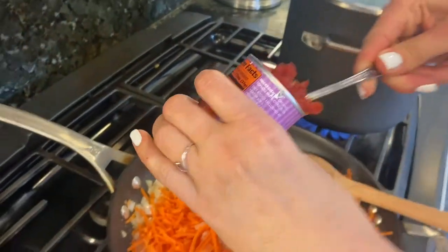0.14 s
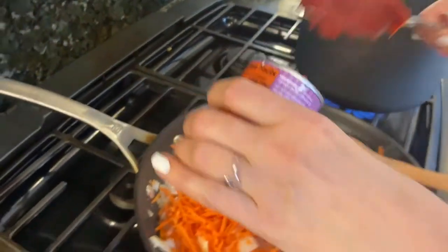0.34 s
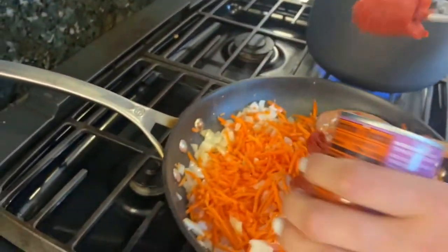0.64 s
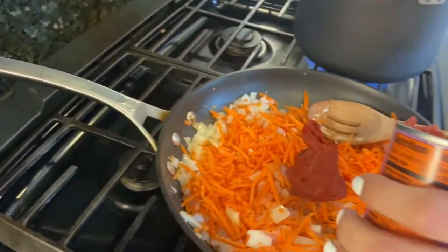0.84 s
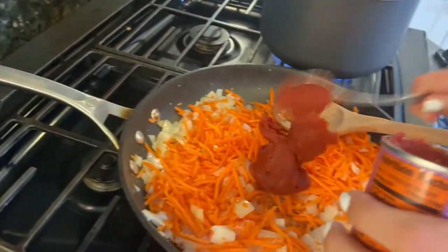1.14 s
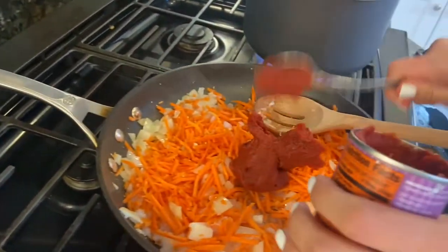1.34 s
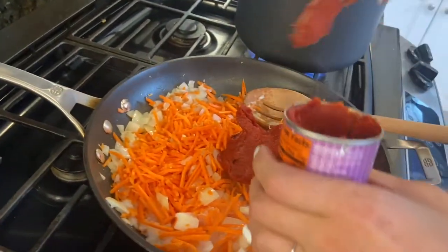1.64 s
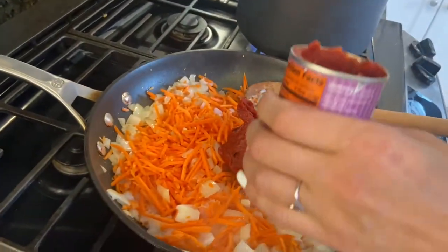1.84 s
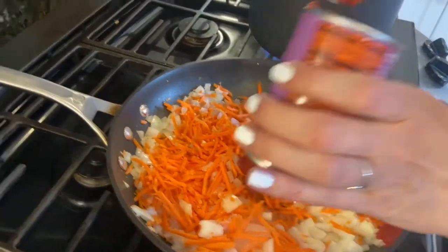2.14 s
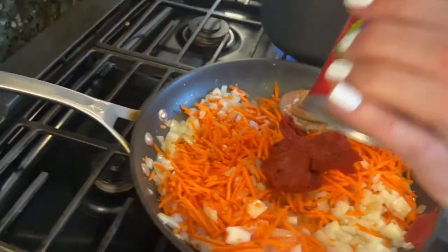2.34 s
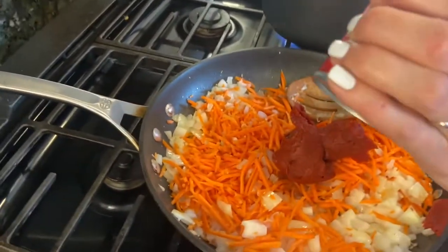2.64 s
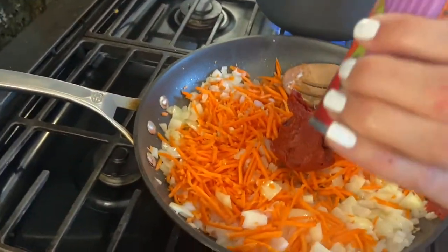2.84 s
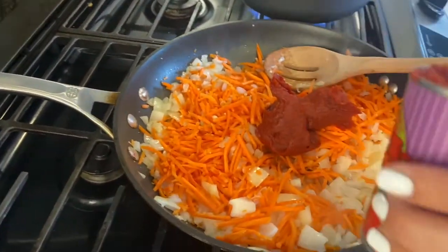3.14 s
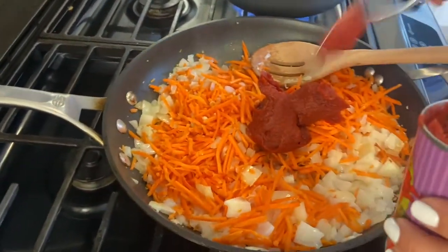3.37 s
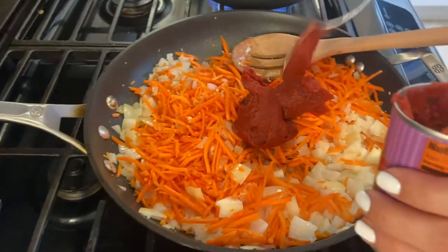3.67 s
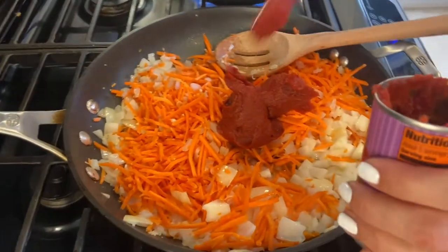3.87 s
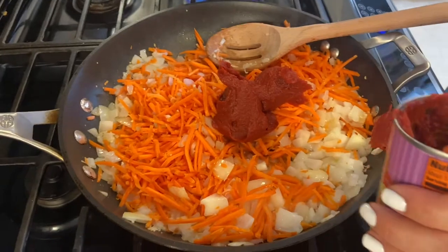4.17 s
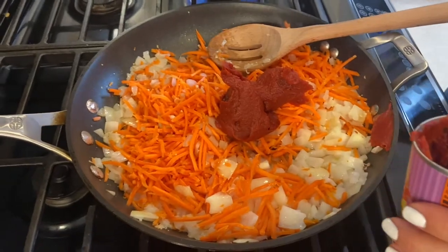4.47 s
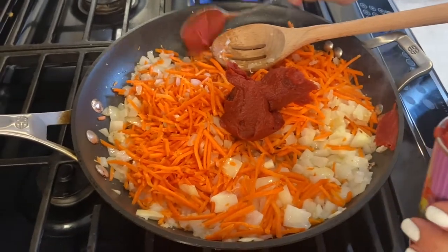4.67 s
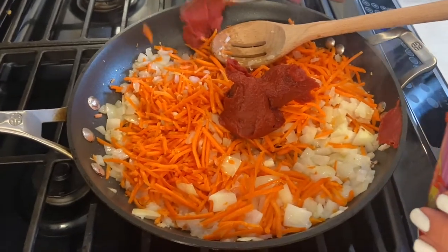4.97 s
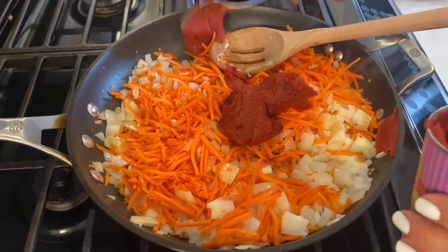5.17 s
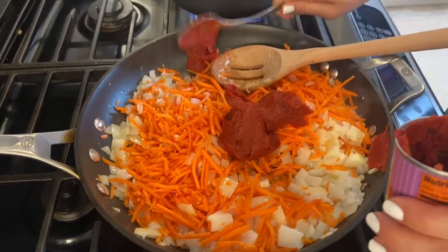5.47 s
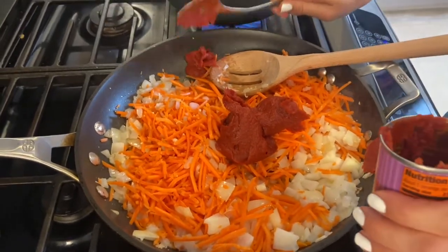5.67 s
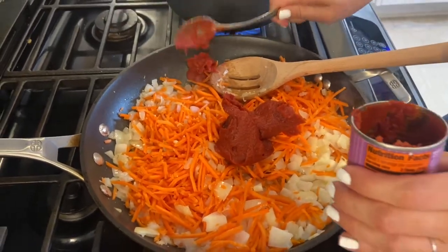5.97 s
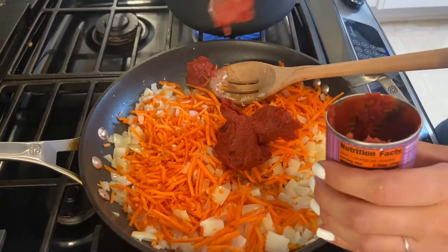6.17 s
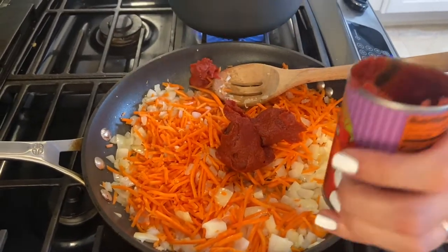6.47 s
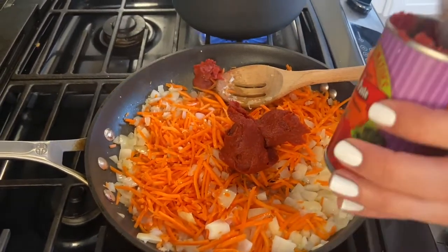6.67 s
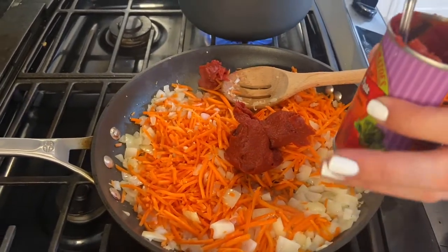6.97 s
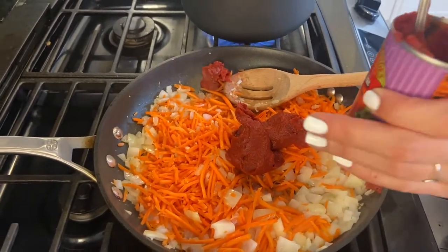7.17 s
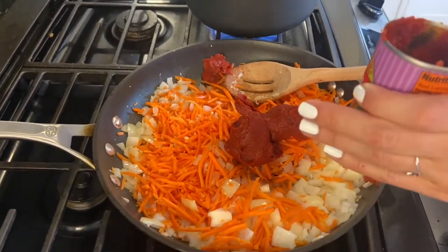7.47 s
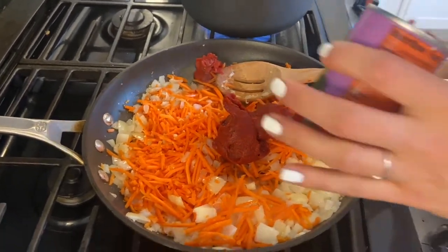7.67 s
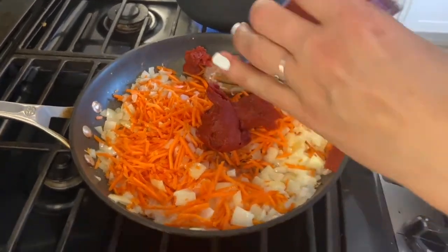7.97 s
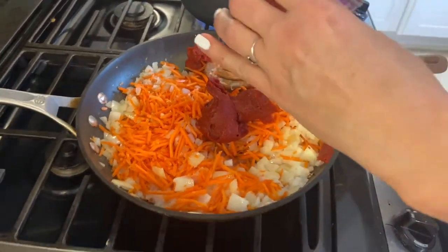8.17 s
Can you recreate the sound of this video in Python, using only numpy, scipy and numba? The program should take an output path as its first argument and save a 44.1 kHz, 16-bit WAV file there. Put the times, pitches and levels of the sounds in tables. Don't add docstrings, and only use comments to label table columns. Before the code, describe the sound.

Faint scrapes and knocks of a spoon inside a small paste-filled can, with a hollow ring, come in two early bursts over a quiet wavering burner. After a gap, nine quick even metal raps strike a pan, each a short dull clank with rattle and low stove thump. Then louder can knocks, scraping and a slight wet slump. Close, left-sided pickup in a small hard-walled kitchen, with only faint electronic hiss on the right.

```python
import sys
import numpy as np
from scipy import signal
from scipy.io import wavfile
from scipy.ndimage import uniform_filter1d
from numba import njit

SR = 44100
rng = np.random.default_rng(int(sys.argv[2]) if len(sys.argv) > 2 else 0)


def persist_wave(psi):
    counts = np.round(np.clip(psi, -1, 1) * 32767).astype(np.int16)
    wavfile.write(sys.argv[1], SR, np.atleast_2d(counts).T)


def invert_db(x):
    u = np.asarray(x, float) / 20
    return 10 ** u


N = 366912

# frequency in Hz, level in dB per Hz.
FLAME = [(8.8, -29), (15, 6.5), (26, 1.5), (75, -11), (110, -14.5), (135, -17.5), (242, -18.5),
         (315, -15.5), (461, -18), (503, -11), (1050, -18), (2110, -15), (6050, -19), (14100, -37),
         (16400, -50)]
FLAME_DB = -54
# centre in Hz, width in Hz, level in dB.
FLAME_TONES = [(103.2, 30, -69), (507.5, 58, -72.5), (792, 29, -74.5), (1336, 510, -67.5)]
# centre in seconds, half length in seconds, rumble in dB.
ARMS = [
    (.1, 0.2, 6),
    (2.62, 0.18, 2),
    (6.15, 0.14, 0.5),
    (7.4, 0.11, 3),
]
SHAKE_SETTLE_S, SHAKE_HISS_DB, SHAKE_RUMBLE_DB, RUMBLE_WANDER_DB = 0.35, 0.4, 5.5, 5.5
KITCHEN_T60_S, KITCHEN_DB = 0.32, -17.5
# start in seconds, level in dB.
SLUMP = [
    (7.385, -48),
    (7.398, -47.5),
    (7.421, -43),
    (7.435, -54),
]

# frequency in Hz, level in dB, t60 in seconds.
CAN_WALL = [(1360, 6, 0.11), (1800, 10, 0.033), (2090, 12, 0.014), (2420, 12, 0.05), (2700, -13, 0.078),
            (4110, -15.5, 0.014), (4270, -17, 0.015), (5500, -4.5, 0.005)]
# start in seconds,
# length in seconds, peak in dB, air column in Hz, grit in dB.
STROKES = [(-.03, 0.13, -58, 870, -14), (.06, .12, -55.5, 790, -16), (0.213, 0.088, -50, 796, -8),
           (2.64, 0.098, -47.5, 837, -9.5), (2.709, .1, -48.5, 840, -20), (2.804, 0.098, -52.5, 850, -5),
           (6.723, 0.06, -61, 905, -12), (6.871, .075, -53.5, 953, -8), (7.163, 0.085, -49.5, 820, -6.5),
           (7.226, 0.097, -47, 835, -15), (7.904, 0.075, -56.5, 860, -16), (8.036, 0.039, -46.5, 990, -21),
           (8.084, 0.054, -52.5, 1000, -3)]
STROKE_PEAK_AT, STROKE_ROUND = 0.59, 0.99
# start in seconds, t60 in seconds,
# level in dB, air column in Hz, grit in dB.
SLIDES = [
    (.18, 0.24, -54, 760, -20),
    (.31, 0.24, -56, 990, -14),
    (2.215, 0.51, -58, 980, -1),
    (2.395, 0.23, -46, 1050, -14),
    (2.43, 0.33, -55.5, 1005, 0),
    (6.815, 0.64, -58, 970, -12),
    (7.385, 0.68, -55, 870, -18),
    (7.845, 0.2, -58, 885, -17),
    (7.995, 0.11, -58, 1000, -15),
    (8.2, 0.49, -62, 930, -14.5),
]
SLIDE_SAG_HZ_PER_S = 180
# start in seconds, peak in dB, air column in Hz,
# hardness of the contact in dB, struck patch of wall in Hz.
KNOCKS = [(0.047, -57, 800, -13, 3080), (0.124, -50.5, 810, -11, 1560), (0.264, -49, 861, -7, 2300),
          (0.292, -33.5, 958, -24, 1730), (2.164, -28.5, 880, -11.5, 2890), (2.174, -33.5, 1024, -34, 2060),
          (2.192, -32, 900, -24, 1800), (2.377, -27.5, 963, -20.5, 2000), (2.542, -45.5, 836, -21, 1840),
          (2.875, -49, 980, -4, 2480), (6.692, -34.5, 860, -5, 2710), (6.784, -22, 1022, -21.5, 1670),
          (6.793, -23.5, 947, -47, 1520), (6.971, -39.5, 783, -24, 2180), (7.191, -42, 906, -15, 2200),
          (7.205, -40, 814, -19, 2200), (7.2195, -43, 840, -23, 2400), (7.297, -46, 790, -15, 3200),
          (7.35, -28, 855, -28.5, 1500), (7.37, -46.5, 850, -5, 2640), (7.822, -32, 904, -8, 2010),
          (7.968, -17, 1037, -28.5, 2100), (8.108, -46.5, 970, -13, 2160), (8.178, -40, 800, -27, 1800)]
COLUMN_T60_S = 0.019
WALL_RING_DB, RING_PER_HARD, RING_PER_BLOW = -3, 0.5, 0.34

# start in seconds, peak in dB, high modes in dB, edge in dB,
# hop of the pan in dB.
RAPS = [
    (4.6536, -15.5, -3.5, 1.5, -11.5),
    (4.818, -16, -5.5, -26, -8),
    (4.9574, -14, -5, -17, -11.5),
    (5.1041, -14.5, -3.5, -10.5, -11.5),
    (5.2616, -13.5, -0.5, -4, -9.5),
    (5.406, -12.5, -3, -4.5, -10),
    (5.558, -13, -3, -4.5, -10),
    (5.7222, -13, -2, -5, -10.5),
    (5.8889, -17.5, 3.5, -39, -11),
]
# frequency in Hz, level in dB, t60 in seconds.
PAN = [(297.5, -10.5, 0.07), (586, -4.5, 0.028), (686, -4, 0.18), (771.4, 2.5, 0.079), (958, 2.5, 0.035),
       (1123, -13, 0.13), (1260, 2, 0.027), (1356, -15.5, 0.21), (1440, -13, 0.12), (1499, -1.5, 0.044),
       (1590, 2.5, 0.042), (1800, 4, 0.048), (1890, -44, 0.05), (2300, -16, 0.055), (2555, -4.5, 0.031),
       (2810, -19.5, 0.15), (3440, -18, 0.082), (3640, -4.5, 0.019), (4200, -19, 0.013), (4660, -10, 0.028),
       (5075, -2.5, 0.033), (5580, 3, 0.011), (5930, -7.5, 0.026), (6270, 1.5, 0.0075), (6830, 0.5, 0.021),
       (7360, -7.5, 0.026), (8550, -18, 0.039), (10470, -9.5, 0.017), (14200, -29, 0.01)]
# centre in Hz, width in Hz, level in dB.
RIM = [(7090, 380, 6), (8620, 350, -1.5), (10340, 360, -3), (14400, 750, -17)]
LOW_MODES_DB, LOW_PER_BLOW = -9, -0.9
# frequency in Hz, level in dB, t60 in seconds.
SPOON = [(2055, -2.5, 0.082), (2744, -4, 0.11), (3890, 11.5, 0.022), (4300, -5.5, 0.23), (4900, -24, .15),
         (9070, 1, 0.013), (11130, -7, 0.012), (14400, -7, .008)]
# time in seconds, level in dB.
SPOON_FREE = [
    (4.7, -37),
    (5.5, -33),
    (5.72, -28),
    (5.89, -12.5),
]
# frequency in Hz, level in dB, rise in seconds,
# t60 in seconds.
STOVE = [(27.8, -10, 0.045, 0.62), (44.8, -7, 0.013, 0.087), (54, 3, 0.022, 0.26), (66.8, -5, 0.04, 0.47),
         (101.6, -17.5, 0.035, 0.47), (212, 4.5, 0.022, 0.13)]


def level(x, db):
    return x * invert_db(db) / np.sqrt(np.mean(x ** 2))


@njit
def svf(x, hz, width):
    y, b, l = np.empty(len(x)), 0., 0.
    for i in range(len(x)):
        g, k = np.tan(np.pi * hz[i] / SR), width / hz[i]
        v = (b + g * (x[i] - l)) / (1 + g * (g + k))
        b, l, y[i] = 2 * v - b, l + 2 * g * v, k * v
    return y


def band(x, hz, width):
    return svf(x, np.full(len(x), 1. * hz), 1. * width)


def walk(rate):
    hold = int(SR / rate)
    steps = np.repeat(rng.standard_normal(N // hold + 1), hold)
    return 0.57 * uniform_filter1d(uniform_filter1d(steps, hold), hold)[:N]


def fade(t, t60):
    return np.exp(-np.log(1000) * t / t60)


def sine(hz, t):
    return np.sin(2 * np.pi * hz * t)


def ring(hz, db, t60, seconds):
    t = np.arange(int(seconds * SR))[:, None] / SR
    sign = (-1) ** (np.arange(np.size(hz)) // 2)
    return (sign * invert_db(db) * fade(t, t60) * sine(hz, t)).sum(axis=1)


def grit(size, rate, spread_db):
    on = rng.random(size) < rate / SR
    impacts = on * rng.standard_normal(size) * invert_db(spread_db * rng.exponential(size=size))
    return level(impacts + 1e-9, 0)


def add(out, s, sound):
    i = int(s * SR)
    out[i:i + len(sound)] += sound[:N - i]


def shaken():
    since = np.arange(N) / SR - np.array(RAPS)[:, :1]
    steps = (since > 0) * np.exp(-np.abs(since) / SHAKE_SETTLE_S)
    return uniform_filter1d(steps.sum(axis=0), size=4000)


def flame():
    hz, db = np.transpose(FLAME)
    t = np.arange(N) / SR
    unrest = shaken()
    hiss_db = SHAKE_HISS_DB * unrest
    rumble_db = SHAKE_RUMBLE_DB * unrest + RUMBLE_WANDER_DB * walk(3)
    rumble_db = rumble_db + sum(d * np.exp(-((t - s) / half) ** 2) for s, half, d in ARMS)
    hiss = 0
    for f in 16 * 2 ** np.arange(0, 10.1, 1 / 3):
        noise = band(band(rng.standard_normal(N), f, f / 3), f, f / 3)
        swell_db = rumble_db if f < 55 else hiss_db
        band_db = np.interp(np.log(f), np.log(hz), db)
        hiss = hiss + invert_db(band_db + swell_db + 2.54 * walk(11)) * noise
    tones = sum(level(band(band(rng.standard_normal(N), f, w), f, w), d) for f, w, d in FLAME_TONES)
    return level(hiss, FLAME_DB) + tones


def kitchen(x):
    t = np.arange(int(.5 * SR)) / SR
    noise = rng.standard_normal(len(t))
    low = band(noise, 760, 5100)
    high = noise - low
    tail = low * fade(t, KITCHEN_T60_S) + high * fade(t, 0.23 * KITCHEN_T60_S)
    tail = (t > .006) * tail
    return invert_db(KITCHEN_DB) * signal.fftconvolve(x, tail / np.linalg.norm(tail))[:N]


def paste():
    out, t = np.zeros(N), np.arange(int(.05 * SR)) / SR
    for s, db in SLUMP:
        plop = band(rng.standard_normal(len(t)), 280, 270) * fade(t, 0.1)
        add(out, s, invert_db(db + 12.5) * plop)
    return out


def pressure(t):
    for s, length, db, hz, grit_db in STROKES:
        share = np.clip((t - s) / length, 0, 1) ** (np.log(.5) / np.log(STROKE_PEAK_AT))
        yield invert_db(db) * np.abs(np.sin(np.pi * share)) ** STROKE_ROUND, hz, grit_db
    for s, t60, db, hz, grit_db in SLIDES:
        since = np.clip(t - s, 0, t60)
        sliding = (t >= s) * (since < t60)
        yield invert_db(db) * sliding * fade(since, t60), hz - SLIDE_SAG_HZ_PER_S * since, grit_db


def scrapes():
    def smooth(x):
        return uniform_filter1d(x, size=500)

    moves = list(pressure(np.arange(N) / SR))
    force = smooth(sum(p for p, _, _ in moves))
    rest = invert_db(-100)
    hz = (smooth(sum(p * f for p, f, _ in moves)) + rest * 900) / (force + rest)
    gritty = smooth(sum(p * invert_db(grit_db) for p, _, grit_db in moves))
    slips = grit(N, rate=5000, spread_db=3.0) * invert_db(1.3 * walk(70))
    column = level(svf(svf(slips, hz, 73.0), hz, 370.0), 0)
    wall = sum(invert_db(db) * band(slips, f, 180) for f, db, _ in CAN_WALL)
    wall = wall + invert_db(-0.5) * band(band(slips, 4100, 3000), 4300, 3600)
    return force * column + gritty * level(band(wall, 1700, 5000), 0)


def knocks():
    out = np.zeros(N)
    wall_hz, wall_db, wall_t60 = np.transpose(CAN_WALL)
    t = np.arange(int(.25 * SR)) / SR
    for s, db, hz, tick_db, spot_hz in KNOCKS:
        ring_db = WALL_RING_DB + RING_PER_HARD * tick_db + RING_PER_BLOW * (db + 29.5)
        swell = (1 - np.exp(-t / 0.00023)) * fade(np.maximum(t - .003, 0), COLUMN_T60_S)
        column = swell * sine(hz, t)
        hard_db = np.where(wall_hz > 3200, tick_db, ring_db - 15)
        scatter = rng.standard_normal((2, len(wall_hz)))
        mode_db = wall_db + hard_db + 3 * scatter[1] - 8
        wall = ring(wall_hz * (1 + 0.066 * scatter[0]), mode_db, wall_t60, .25)
        spot = invert_db(ring_db - 11) * fade(t, 0.064) * sine(spot_hz, t)
        wash = band(band(rng.standard_normal(len(t)), spot_hz, 870), 1300, 1280)
        wash = wash * (fade(t, 0.047) + invert_db(-32.0) * fade(t, 0.16))
        hiss = band(band(rng.standard_normal(len(t)), 5860, 4100), 4200, 6500)
        tick = hiss * (fade(t, 0.011) + invert_db(-5) * fade(t, 0.06))
        dent = invert_db(ring_db + 1) * fade(t, 0.0062) * sine(1650, t)
        knock = column + dent + wall + spot + invert_db(ring_db + 13.0) * wash + invert_db(tick_db + 8) * tick
        add(out, s, -invert_db(db + 2.5) * knock)
    return signal.sosfilt(signal.butter(2, 420, "high", fs=SR, output="sos"), out)


def raps():
    out = np.zeros(N)
    hz, db, t60 = np.transpose(PAN)
    t = np.arange(int(.7 * SR)) / SR
    for s, peak_db, high_db, edge_db, hop_db in RAPS:
        low_db = LOW_MODES_DB + LOW_PER_BLOW * (peak_db + 14.5)
        scatter = rng.standard_normal((2, len(hz)))
        place_db = np.interp(hz, [1080, 1336, 2900, 3200, 6050, 6400],
                             [low_db, 0, 0, high_db, high_db, edge_db])
        body = ring(hz * (1 + 0.004 * scatter[0]), db + place_db + 1.84 * scatter[1], t60, .25)
        body = body * (1 - np.exp(-t[:len(body)] / 0.00079))
        spoon = invert_db(np.interp(s, *np.transpose(SPOON_FREE))) * ring(*np.transpose(SPOON), .4)
        noise = rng.standard_normal((2, len(t))) * (fade(t, 0.039) + invert_db(-16.5) * fade(t, 0.24))
        high = band(band(noise[0], 4280, 2300), 4330, 3600)
        edge = band(band(noise[1], 6000, 2800), 7200, 4500)
        rim = sum(invert_db(d) * band(band(noise[1], f, w), f, w) for f, w, d in RIM)
        dense = invert_db(high_db) * high + invert_db(edge_db) * (edge + rim)
        hops = (1 - fade(t, 0.25)) * fade(t, 0.23) * grit(len(t), rate=7000, spread_db=1.5)
        hops = hops * invert_db(2.9 * walk(95)[:len(t)])
        held_db = db + 0.4 * place_db + 2.0 * scatter[0] - 3 * np.log2(hz / 1000)
        held = ring(hz, held_db, 0.3 * np.minimum(t60, .09), .1)
        chatter = signal.fftconvolve(hops, held / np.linalg.norm(held))[:len(t)]
        rasp = invert_db(-37) * band(hops, 1800, 2000) + invert_db(9.0) * band(hops, 144, 120)
        shake = sum(invert_db(d) * (1 - np.exp(-t / rise)) ** 2 * fade(t, long) * sine(f, t)
                    for f, d, rise, long in STOVE)
        hopping = invert_db(hop_db) * (chatter + rasp + invert_db(-4.5) * shake)
        add(out, s, invert_db(peak_db - 6.5) * body)
        add(out, s, invert_db(peak_db) * spoon)
        add(out, s, invert_db(peak_db) * (invert_db(-5) * dense + hopping))
    return out


def scene():
    near = paste() + scrapes() + knocks() + raps()
    left = 2 * (near + kitchen(near) + flame())
    return np.array([left, np.zeros(N)])


def roll_off(x):
    return signal.sosfilt(signal.butter(12, 16530, fs=SR, output="sos"), x)


def record(dry):
    hiss = level(band(rng.standard_normal(N), 4000, 12000), -90.5)
    low_pass = signal.ellip(8, .2, 60, 16200, fs=SR, output="sos")
    mix = signal.sosfilt(low_pass, [dry[0], hiss])
    return roll_off(mix)


dry = scene()
out = record(dry)
persist_wave(out)
```